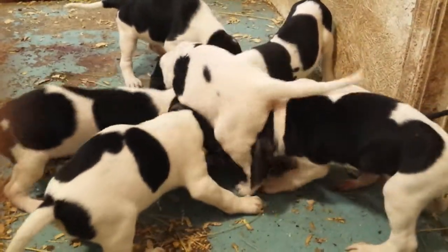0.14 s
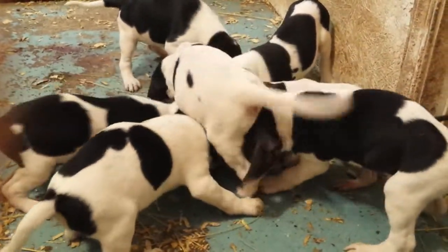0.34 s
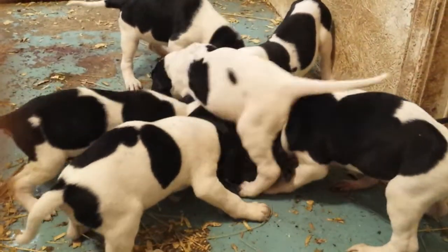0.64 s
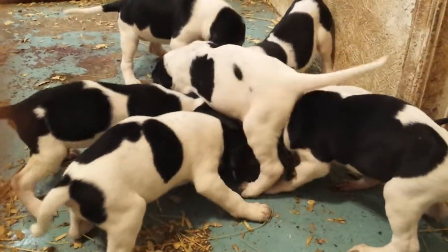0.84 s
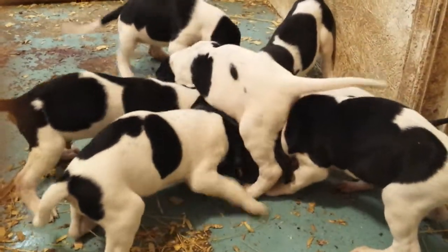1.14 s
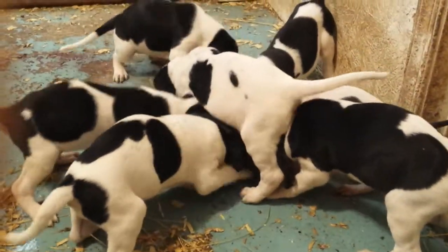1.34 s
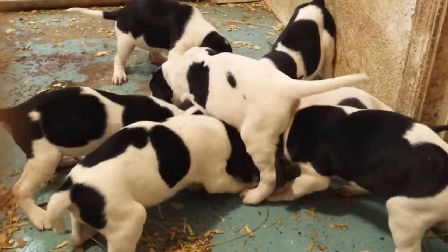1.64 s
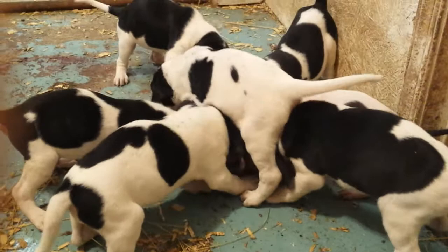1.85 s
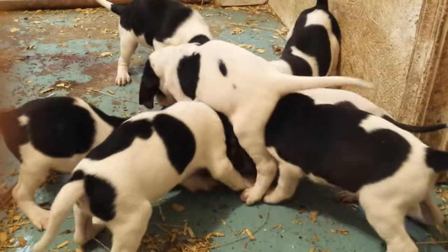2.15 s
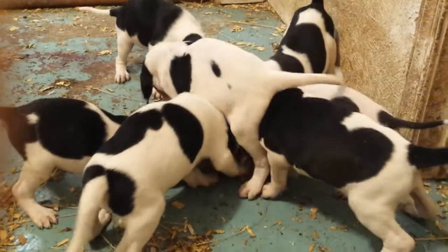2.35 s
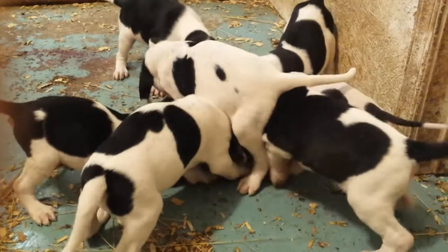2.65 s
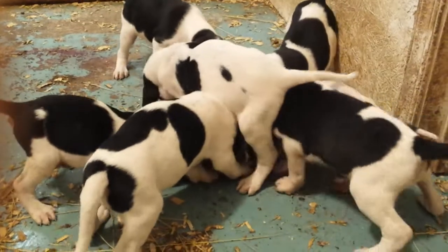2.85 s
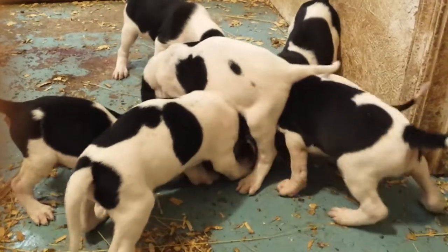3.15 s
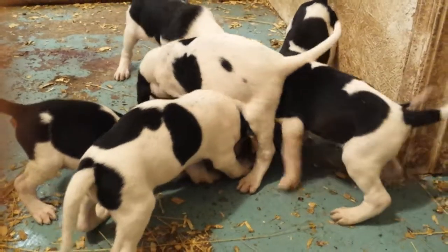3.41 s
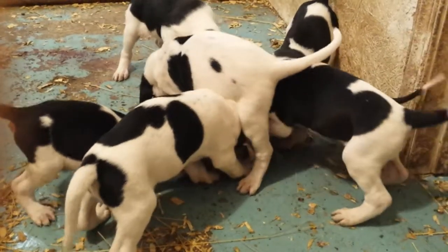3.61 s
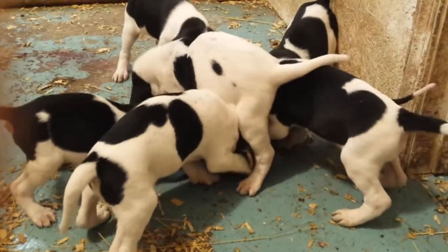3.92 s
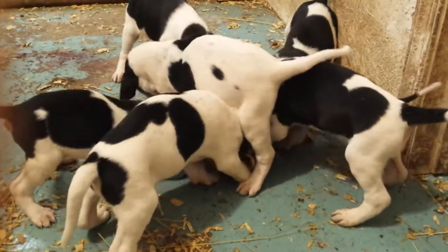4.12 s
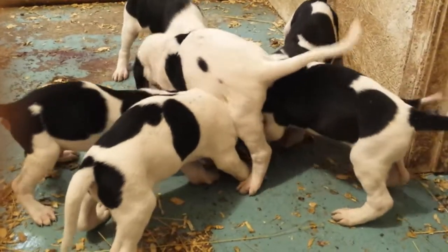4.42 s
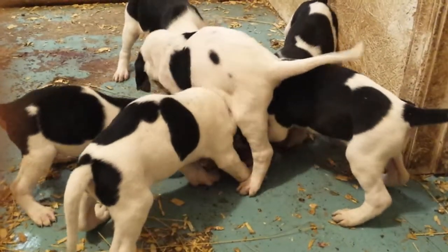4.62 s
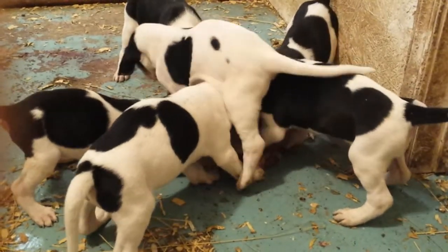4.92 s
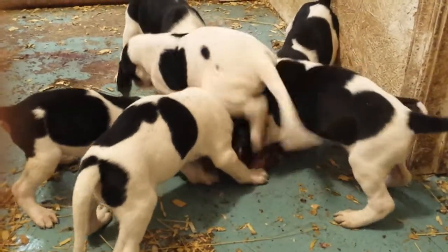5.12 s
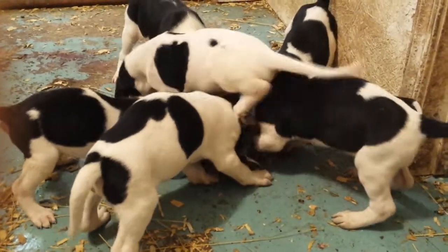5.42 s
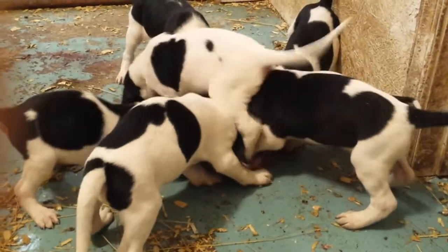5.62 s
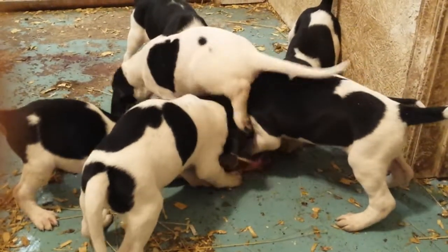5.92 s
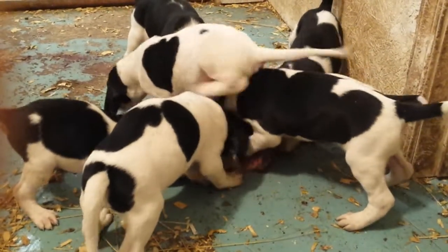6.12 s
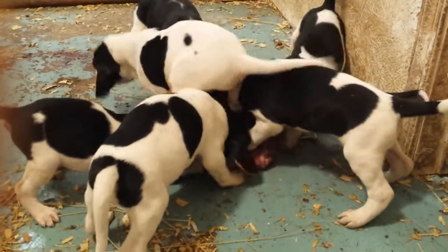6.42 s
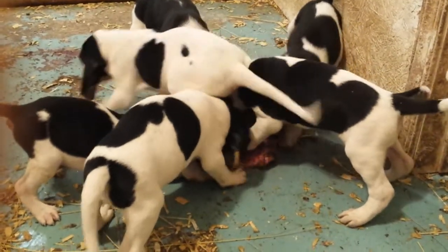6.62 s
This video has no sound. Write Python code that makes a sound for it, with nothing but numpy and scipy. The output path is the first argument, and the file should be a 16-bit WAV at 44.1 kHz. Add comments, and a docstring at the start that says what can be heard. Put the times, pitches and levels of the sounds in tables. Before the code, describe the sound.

In a small, lively indoor pen, close-up straw scuffs and dry crackles run under puppy voices. An unsteady whine comes early, then scattered short yips, a sharp click around one and a half seconds, paw thuds and an overlapping group of yips. Later a louder whine slides downward, followed by brief yips, a low grunt and wet chewing clicks, over very faint room rumble.

```python
"""A hard-walled pen, where puppies crowd over a piece of food about a metre from a stereo microphone.
They whine and yip, two at once at times, as quavering harmonics coloured by throat and nose; the nose
whistles are nearly pure tones. Jaws smack and click as short resonant noise, paws thud as dying sines,
straw rustles as crackling noise, and the room rings after every call with wall echoes and a diffuse tail."""
import sys
import numpy as np
from scipy import signal
from scipy.fft import rfft, irfft, next_fast_len
from scipy.io import wavfile

SR = 44100
rng = np.random.default_rng(int(sys.argv[2]) if len(sys.argv) > 2 else 0)


def wav_out(sig):
    """Save sig, one row per channel (or a flat mono array), as 16-bit PCM at SR to the path in sys.argv[1]."""
    wavfile.write(sys.argv[1], SR, np.round(np.clip(np.atleast_2d(sig).T, -1, 1) * 32767).astype(np.int16))


N = 298116
TIME = np.arange(N) / SR

# Event levels in the tables are starting points in dB; the functions trim them further.

# faint rumble of the building: hz [Hz], relative_db [dB]
ROOM_TONE = [(12, -63), (20, -4.5), (103, -5.5), (160, -10.5), (270, -8), (310, -12.5), (656, -12.5),
             (1240, -22), (2930, -25.5), (3970, -20), (9370, -24), (12400, -31), (15000, -31.5)]
ROOM_TONE_DB = -57.5
# decay of the room's tail: hz [Hz], t60_s [s]
ROOM_T60 = [(150, 0.13), (600, 0.5), (1400, 0.47), (4000, 0.27), (8000, 0.4), (14000, 0.13)]
# room (width, length, height) and the microphone's place in it, in m
ROOM_M, MIC_M = (3.3, 4.1, 2.4), (1.9, 1.7, 0.94)
# tone balance of the microphone's two ports: hz [Hz], left_minus_right_db [dB]
PORT_BALANCE = [(60, 2), (110, 2.5), (200, 1), (380, 1.5), (690, 2), (1280, 2.5), (2360, -2.5), (4360, 3),
                (8040, -8), (14800, 0)]
TOP_HZ = 14700

# colour of the rubbed straw: hz [Hz], gain_db [dB]
STRAW_COLOUR = [(150, -15.5), (260, -2), (650, -4), (1400, -5), (1900, -8), (2600, -11.5), (3500, -7.5),
                (4400, -3), (5200, -6), (6400, 2.5), (7700, -6), (9200, -11.5), (11000, -22.5),
                (14500, -49)]
# scuffs of paws and bodies through the straw: start_s [s], length_s [s], level_db [dB]
SCUFFS = [(0.004, 0.12, -46), (0.193, 0.099, -47), (0.342, 0.03, -45.5), (0.539, 0.33, -48.5),
          (0.952, 0.09, -46.5), (1.112, 0.078, -40.5), (1.305, 0.066, -48), (1.571, 0.038, -42.5),
          (1.714, 0.16, -48), (1.922, 0.052, -47.5), (2.14, 0.017, -69), (2.195, 0.11, -58.5),
          (2.369, 0.029, -48), (2.45, 0.26, -50), (2.75, .12, -46), (2.95, 0.63, -52.5),
          (3.328, 0.19, -48.5), (3.611, 0.045, -41.5), (3.735, 0.2, -46.5), (3.94, 0.12, -49.5),
          (4.073, 0.12, -50), (4.287, 0.046, -48), (4.563, 0.027, -44.5), (4.66, 0.065, -52),
          (4.855, 0.15, -49.5), (5.01, 0.33, -48), (5.399, 0.091, -45.5), (5.668, 0.13, -46.5),
          (5.875, 0.048, -45), (5.983, 0.049, -44), (6.189, 0.21, -48), (6.438, .14, -44.5),
          (6.597, 0.25, -44)]
SCUFF_ATTACK_S, SCUFF_T60_S = 0.026, 0.34
STIR_DB = -67  # the straw is never quite still

# paws landing: start_s [s], level_db [dB], pitch_hz [Hz], t60_s [s]
THUDS = [(1.149, -51.5, 171, 0.091), (2.387, -53, 138, 0.067), (3.261, -42, 276, 0.05),
         (3.322, -41, 138, 0.066), (3.343, -42, 232, 0.027), (4.648, -44.5, 219, 0.056),
         (5.377, -42, 170, 0.028), (6.6, -46, 242, 0.048), (6.725, -43, 263, 0.041)]
# low grunt: time_s [s], pitch_hz [Hz], level_db [dB]
GRUNT = [(6.345, 262, -49), (6.358, 231, -40), (6.38, 195, -52)]

# colour of small hard cracks and scraping stalks: hz [Hz], gain_db [dB]
CLICK_COLOUR = [(1500, -4), (3000, 0.5), (4500, 4.5), (6200, 2.5), (7700, 4.5), (9000, -5.5), (12000, -5),
                (15000, -35)]
# sharp clicks of teeth and claws: start_s [s], level_db [dB], body_db (re click) [dB], ring_hz [Hz]
CLICKS = [(0.352, -54, 2, 5000), (0.4821, -45.5, 5.5, 7310), (0.9543, -36.5, -7, 4310),
          (1.336, -37, -9, 6360), (1.363, -37, -6, 7440), (1.505, -34, -6, 6450), (1.557, -34, -3, 6400),
          (1.59, -21, -3.5, 6600), (2.2265, -44.5, -2, 6400), (2.8623, -31, -2.5, 4200),
          (3.261, -33.5, -20, 6550), (3.298, -40.5, -6, 6470), (3.585, -38, 0.5, 4390),
          (6.5798, -28.5, -9, 5700), (6.7276, -35.5, -11, 4330)]
CLICK_PAN_DB = 1  # left minus right
# loudest ticks of snapping straw: start_s [s], level_db [dB], left_minus_right_db [dB]
TICKS = [(0.681, -32, 0), (2.448, -33, 1), (2.521, -32.5, 7), (3.179, -33, 0), (3.3367, -32.5, 6),
         (3.3635, -29, 1), (3.733, -28.5, 10), (4.812, -35.5, 2), (4.8698, -32.5, 5), (5.3947, -27.5, 1),
         (5.598, -29.5, 1.5), (6.1575, -27.5, 0), (6.4006, -35, -6)]
TICK_HZ, TICK_SCATTER = 6200, 0.023  # ring of a stalk, and its spread as a share from stalk to stalk
# wet smacks and hisses of the mouth: start_s [s], level_db [dB], mouth_hz [Hz], length_s (twice the rise) [s]
SMACKS = [(0, -32, 4240, 0.017), (0.241, -47, 3350, 0.019), (0.34, -41.5, 1250, 0.0064),
          (0.35, -35, 1040, 0.005), (1.024, -41.5, 1180, 0.015), (1.09, -44.5, 630, 0.021),
          (2.859, -38, 1090, 0.005), (3.291, -48.5, 2070, .01), (3.59, -45, 1240, 0.005),
          (4.529, -49, 1220, 0.0086), (4.994, -42, 675, 0.016), (5.416, -43, 5540, 0.036),
          (5.845, -43, 4730, 0.027), (6.231, -49, 1620, 0.0053), (6.432, -45.5, 1180, 0.026),
          (6.588, -30, 705, 0.005), (6.723, -31, 830, 0.0032)]

# thin nose whistles, one list each: time_s [s], pitch_hz [Hz], level_db [dB]
WHISTLES = [
    [(.022, 7650, -37), (.036, 7480, -27), (.055, 7170, -35), (.075, 7420, -35)],
    [(3.09, 8370, -55), (3.125, 8000, -63)],
    [(3.4, 8520, -47), (3.42, 8500, -52)],
    [(5.205, 8040, -43.5), (5.25, 8020, -43.5), (5.29, 7700, -68)],
]
# open mouth, weighted by 5 - nasality for overtones and by 1 for breath: hz [Hz], gain_db [dB]
THROAT = [(1400, 5), (2050, 3.5), (2400, 0), (2850, -0.5), (3500, 4.5), (4200, 2.5), (4900, 2.5),
          (5600, -1.5), (7600, 2.5), (8600, -4), (12000, -49)]
# nose, weighted by nasality: hz [Hz], gain_db [dB]
NOSE = [(1400, -1.5), (2300, -16), (3000, -5), (3700, -10.5), (4400, 1), (5200, -22), (6100, 14.5),
        (7900, 2), (9000, -12), (12000, -53)]
# yips, each a rougher catch, a quick glide up or down to a clearer note, and a slide as it fades:
# start_s [s], catch_s [s], note_s [s], catch_hz [Hz], note_hz [Hz], end_hz [Hz], catch_db [dB], note_db [dB],
# octave_db (re level) [dB], overtone_db (re level) [dB], roughness [0 clear, 1 rough], nasality [0-2],
# right_m [m], ahead_m [m]
YIPS = [(0, 0.0028, 0.0084, 764, 781, 763, -8, -35.5, -19.5, -10, 0.38, 1, 0.066, 1.27),
        (1.126, 0.032, 0.034, 463, 560.7, 514, -35.5, -24, -18, -22, 0.49, 0.71, 0.13, 1.23),
        (1.762, .02, 0.045, 573, 710, 654, -26.5, -26, -13, -23.5, 0.08, 0.77, 0.059, 1.07),
        (3.491, 0.0049, 0.019, 569, 513, 566, -36, -36.5, -18.5, -20, 0.44, 0.35, 0.094, 0.67),
        (3.865, .002, 0.0034, 693, 712, 726, -33, -45.5, -12.5, -11, 0.15, .5, 0.14, 1.26),
        (3.896, .02, .13, 695, 738, 640.6, -31, -31.5, -17.5, -16.5, 0.16, 1, 0.05, 1.3),
        (3.918, 0.0022, 0.052, 890, 889, 835, -59, -28.5, -13, -10, 0.26, 0.03, 0.061, 1.0),
        (3.997, 0.0019, 0.0126, 812, 818.4, 788, -38, -36.5, -5, -3.5, 0.44, .05, 0.11, 1.0),
        (4.638, 0.0046, .035, 589, 483, 540, -41.5, -40.5, -23.5, -17.5, 1.11, 1, 0.013, 1.1),
        (5.823, .028, .035, 505, 668, 563.6, -38, -27.5, -22.5, -24, 0.82, 1, 0.035, 1.19),
        (5.958, 0.003, 0.052, 870, 836, 820, -36, -42.5, -20.5, -18, 0.54, 0.2, 0.044, 1.16),
        (6.254, 0.017, 0.034, 447, 636, 603.4, -44, -28.5, -23, -23, 0.24, .95, .031, 0.97),
        (6.607, 0.0019, 0.039, 778, 783, 802, -35, -31.5, -15.5, -24, 0.24, 0.57, 0.023, 1.25)]
GLIDE_S, FADE_DB = 0.01464, 5  # time from catch to note; loss of level along the note
CATCH_OCTAVE_DB, END_OCTAVE_DB = 6.5, 7  # lift of the octave in the catch and at the end of the note
CATCH_OVERTONE_DB, CATCH_SAG = 4, 0.016  # the catch is brighter, and its pitch sags by this share
CATCH_SHIFT = 0.61  # share of the way from catch level to note level covered before the glide
CLEAR_SHARE = 0.53  # share of the roughness that stays in the note
# two long whines, one quavering, one sinking: time_s [s], pitch_hz [Hz], level_db [dB], octave_db (re level) [dB]
WHINES = [
    [(.585, 540, -45, -9), (.612, 491.5, -38.5, -6.5), (.638, 562, -29, -20), (.652, 758, -33.5, -9.5),
     (.665, 661.5, -30.5, -.5), (.69, 728, -28, -8), (.73, 663.6, -43, 4), (.742, 638.4, -27, 2),
     (.764, 653, -47, 11.5), (.777, 722, -28, -9), (.8, 649.5, -22.5, -27), (.825, 680, -35.5, 2)],
    [(5.016, 700, -26.5, -19), (5.065, 757.5, -38.5, -9), (5.11, 734.4, -29, -21),
     (5.168, 763.4, -44.5, -1), (5.182, 747, -28, -22), (5.215, 663.5, -26, -13), (5.25, 640, -26.5, -16),
     (5.285, 581.6, -20, -24), (5.332, 548, -26.5, -35.5)],
]
# voice of each long whine: mean_overtone_db [dB], start_roughness [0-1], nasality [0-2], right_m [m], ahead_m [m]
WHINERS = [(-50.5, 0.59, 0.14, 0.12, 1.1), (-50, 0, 0.97, 0.065, .85)]
SETTLE_S, SETTLED_ROUGH = 0.052, 0.014  # a long whine soon clears to this roughness
CREAK_HZ, CREAK_ROUGH = 674, 0.93  # below this pitch it creaks: added roughness per share of pitch lost


def undb(db):
    """Decibels to gain."""
    return 10 ** (np.asarray(db) / 20)


def unit(x):
    """Scale to rms 1."""
    return x / np.sqrt(np.mean(x ** 2) + 1e-20)


def at(points, hz):
    """Read a spectrum on a log-frequency axis."""
    f, value = np.transpose(points)
    return np.interp(np.log(np.maximum(hz, 1)), np.log(f), value)


def shape(x, gain):
    """Filter by a gain that is a function of frequency."""
    size = x.shape[-1]
    return irfft(rfft(x) * gain(np.arange(size // 2 + 1) * SR / size), size)


def colour(x, points, size=512):
    """Minimum-phase filter with the given spectrum, so that attacks stay sharp."""
    hz = np.arange(size // 2 + 1) * SR / size
    cepstrum = irfft(np.log(undb(at(points, hz))))
    # fold the cepstrum forward to make the filter causal
    cepstrum[1:size // 2] *= 2
    cepstrum[size // 2 + 1:] = 0
    impulse = irfft(np.exp(rfft(cepstrum)))
    return signal.lfilter(impulse, 1, x)


def resonate(x, hz, q):
    """One resonance."""
    return signal.lfilter(*signal.iirpeak(hz, q, fs=SR), x)


def wobble(size, hz):
    """Smooth random motion of spread 1, mostly slower than hz."""
    noise = rng.standard_normal(next_fast_len(size + SR // 4))
    return unit(shape(noise, lambda f: 1 / (1 + (f / hz) ** 4)))[:size]


def pan(x, db):
    """Place a sound by its left-minus-right level."""
    return x * undb(np.array([[db], [-db]]) / 2)


def add(out, x, s):
    """Mix x in at time s."""
    i = max(int(s * SR), 0)
    out[..., i:i + x.shape[-1]] += x[..., :max(N - i, 0)]


def diffuse(size, alike_hz=850):
    """Noise from all sides: the bass is alike in both channels."""
    mid, side = rng.standard_normal((2, size))
    side = shape(side, lambda f: np.hypot(f, alike_hz / 4) / np.hypot(f, alike_hz))
    return unit(mid + side * np.array([[1], [-1]]))


def burst(t60, size=2048):
    """A crack of noise that dies away, drawn separately for each channel."""
    return rng.standard_normal((2, size)) * undb(-60 * TIME[:size] / t60)


def snap(hz, t60, ring=2.7, q=4):
    """Something small and hard cracks and rings briefly at its own pitch."""
    crack = burst(t60)
    ringing = crack + ring * resonate(crack, hz, q)
    return colour(ringing, CLICK_COLOUR) / (1 + ring / 2)


def play(rows, fade_s=0.0042):
    """Soft on-off gate of one call, then its controls sample by sample."""
    s, *columns = np.transpose(rows)
    t = np.arange(s[0], max(s[-1], s[0] + fade_s) + fade_s, 1 / SR)
    gate = np.clip(np.minimum(t - t[0], t[-1] - t) / fade_s, 0, 1)
    return [gate] + [np.interp(t, s, column) for column in columns]


def tone(rows, waver):
    """A nearly pure, wavering note."""
    gate, hz, db = play(rows)
    hz = hz * (1 + waver * wobble(len(hz), 360))
    note = np.sqrt(2) * np.sin(2 * np.pi * np.cumsum(hz) / SR)
    out = np.zeros(N)
    add(out, gate * undb(db) * note, rows[0][0])
    return out


def room_tone():
    """A faint rumble of the building: diffuse noise shaped towards the bass."""
    return unit(shape(diffuse(N), lambda f: undb(at(ROOM_TONE, f)))) * undb(ROOM_TONE_DB)


def room(right_m, ahead_m, tail_db, bounce=0.58, width=1.7, build_s=0.019, order=3):
    """Stereo response to a sound on the floor: mirror images in the walls, then a frequency-dependent tail."""
    source = (MIC_M[0] + right_m, MIC_M[1] + ahead_m, 0)
    turn = np.arange(-order, order + 1)
    images = [turn * wall + np.where(turn % 2, wall - s, s) - mic
              for wall, s, mic in zip(ROOM_M, source, MIC_M)]
    x, y, z = np.meshgrid(*images)
    r = np.sqrt(x ** 2 + y ** 2 + z ** 2)
    bounces = sum(np.meshgrid(abs(turn), abs(turn), abs(turn)))
    # the floor's image coincides with the source, hence 1 + bounce
    gain = bounce ** bounces * r.min() / r / (1 + bounce)
    lag = np.rint((r - r.min()) / 343 * SR).astype(int)  # speed of sound 343 m/s
    t = TIME[:int(.5 * SR)]
    # each channel favours what arrives from its own side
    early = np.array([np.bincount(lag.ravel(), (gain * (1 + side * width * x / r)).ravel(), len(t))
                      for side in (-1, 1)])
    noise = diffuse(len(t), 980)
    centres = [hz for hz, _ in ROOM_T60]
    tail = 0
    for weights, (_, t60) in zip(np.eye(len(centres)), ROOM_T60):
        band = shape(noise, lambda f: at(list(zip(centres, weights)), f))
        tail = tail + band * undb(-60 * t / t60)
    tail = unit(tail * (1 - np.exp(-(t / build_s) ** 2))) / np.sqrt(len(t))
    return early + tail * undb(tail_db)


def echo(x, response):
    """Play a sound into the room."""
    return signal.fftconvolve(np.atleast_2d(x), response, axes=1)[:, :N]


def scuffing():
    """How hard the straw is rubbed: scuffs with attack, hold and release over a faint constant stir."""
    power = np.full(N, undb(STIR_DB) ** 2)
    for s, length, db in SCUFFS:
        t = TIME[:int((length + SCUFF_T60_S) * SR)]
        attack = np.minimum(t / SCUFF_ATTACK_S, 1)
        release_db = -60 * np.maximum(t - length, 0) / SCUFF_T60_S
        add(power, (attack * undb(db + release_db)) ** 2, s)
    return np.sqrt(power)


def straw(rustle_db=-3.0, grains_hz=1400, spread_db=2.5, flutter_db=2, stalk_db=-4, stalk_q=14, count=420):
    """Fur and paws rub over straw: a hiss full of tiny crackles, and single stalks scraping at their own pitch."""
    sizes = undb(spread_db * np.minimum(rng.exponential(size=N), 5))
    grains = (rng.random(N) < grains_hz / SR) * sizes
    crackle = signal.fftconvolve(grains[None], burst(0.0034), axes=1)[:, :N]
    hiss = unit(colour(unit(crackle) + diffuse(N), STRAW_COLOUR))
    stalks = np.zeros((2, N))
    for when, pitch, size, length in rng.random((count, 4)):
        scrape = resonate(burst(0.075 + 0.02 * length), 3500 + 5000 * np.sqrt(pitch), stalk_q)
        add(stalks, scrape * undb(-16 * size), when * TIME[-1])
    rustle = hiss + undb(stalk_db) * unit(colour(stalks, CLICK_COLOUR))
    return rustle * scuffing() * undb(rustle_db + flutter_db * wobble(N, 8.5))


def paws():
    """Soft pads thud on the floor as quickly rising, dying sines; a puppy grunts."""
    out = tone(GRUNT, waver=0.016)
    t = TIME[:SR // 4]
    for s, db, hz, t60 in THUDS:
        envelope = undb(db - 60 * t / t60) * (1 - np.exp(-t / 0.0027))
        add(out, 2 * envelope * np.sin(2 * np.pi * hz * t), s)
    return out


def chewing(click_db=2, body_db=3, tick_db=-4, smack_db=-1, mouth_q=2.6):
    """Teeth and claws click, straw snaps, and wet smacks ring the mouth cavity."""
    out = np.zeros((2, N))
    for s, db, low_db, hz in CLICKS:
        body = 2 * resonate(burst(0.034), 980, 0.87)
        click = snap(hz, t60=0.024) + undb(low_db + body_db) * body
        add(out, pan(click, CLICK_PAN_DB) * undb(db + click_db), s)
    for s, db, pan_db in TICKS:
        hz = TICK_HZ * (1 + TICK_SCATTER * rng.standard_normal())
        add(out, pan(snap(hz, t60=0.029), pan_db) * undb(db + tick_db), s)
    for s, db, hz, length in SMACKS:
        t = TIME[:SR // 4] / length
        wet = unit(resonate(resonate(diffuse(len(t)), hz, mouth_q), hz, mouth_q / 2))
        swell = 2 * t * np.exp(1 - 2 * t)  # peaks at 1, halfway through the length
        add(out, wet * swell * undb(db + smack_db), s)
    return out


def whine(rows, nasal, jitter=0.11, shimmer=0.86, quiver=0.00612, flicker_db=3, count=20):
    """Vocal folds: strong fundamental, octave and weak, flickering overtones; strain makes cycles uneven."""
    gate, hz, db, octave_db, overtone_db, rough = play(rows)
    size = len(hz)
    hz = hz * (1 + jitter * rough * wobble(size, 197) + quiver * wobble(size, 36.4))
    phase = 2 * np.pi * np.cumsum(hz) / SR
    overtones = 0
    for k in range(3, count):
        tract_db = (5 - nasal) * at(THROAT, k * hz) + nasal * at(NOSE, k * hz)
        partial = np.sin(k * phase + rng.uniform(0, 2 * np.pi))
        overtones = overtones + undb(tract_db + flicker_db * wobble(size, 25)) * partial
    # air hisses through the folds once a cycle
    air = colour(rng.standard_normal(size), THROAT) * (1 + np.cos(phase))
    upper = unit(unit(overtones) + rough * unit(air))
    lower = np.sqrt(2) * (np.sin(phase) + undb(octave_db) * np.sin(2 * phase))
    voice = lower + undb(overtone_db) * upper
    return gate * undb(db) * voice * (1 + shimmer * rough * wobble(size, 145))


def yip(s, catch_s, note_s, catch_hz, note_hz, end_hz, catch_db, note_db, octave_db, overtone_db, rough):
    """Catch, glide and fading note: rows of time_s, pitch_hz, level_db, octave_db, overtone_db, roughness."""
    glide = s + catch_s
    note = glide + GLIDE_S
    clear = rough * CLEAR_SHARE
    glide_db = catch_db + CATCH_SHIFT * (note_db - catch_db)
    catch_colour = (octave_db + CATCH_OCTAVE_DB, overtone_db + CATCH_OVERTONE_DB, rough)
    return [(s, catch_hz * (1 + CATCH_SAG), catch_db, *catch_colour),
            (glide, catch_hz, glide_db, *catch_colour),
            (note, note_hz, note_db, octave_db, overtone_db, clear),
            (note + note_s, end_hz, note_db - FADE_DB, octave_db + END_OCTAVE_DB, overtone_db, clear)]


def drawn_out(curve, overtone_db, rough, opening=0.94):
    """A long whine clears, and creaks where it sinks; overtones swell with the octave as the mouth opens."""
    s, hz, db, octave_db = np.transpose(curve)
    mouth_db = db + octave_db
    upper_db = overtone_db + opening * (mouth_db - mouth_db.mean()) - db
    creak = CREAK_ROUGH * np.maximum(1 - hz / CREAK_HZ, 0)
    roughness = SETTLED_ROUGH + creak + rough * np.exp(-(s - s[0]) / SETTLE_S)
    return np.transpose([s, hz, db, octave_db, upper_db, roughness])


def voices(whistle_db=-1):
    """Every call sounds from its own spot in the pen; noses whistle now and then."""
    whistles = sum(tone(rows, waver=0.0082) for rows in WHISTLES)
    out = echo(whistles, room(0, 1, tail_db=-8)) * undb(whistle_db)
    calls = [(yip(*row[:-3]), row[-3:]) for row in YIPS]
    calls += [(drawn_out(curve, *row[:-3]), row[-3:]) for curve, row in zip(WHINES, WHINERS)]
    for rows, (nasal, right_m, ahead_m) in calls:
        add(out, echo(whine(rows, nasal), room(right_m, ahead_m, tail_db=-4.5)), rows[0][0])
    return out


def scene(voice_db=-2):
    """Voices, chewing and straw ring in the room; paws stay dry, and a faint rumble lies under all."""
    near_floor = room(0, .8, tail_db=-6.5, bounce=0.2, build_s=0.0092)
    small_noises = echo(chewing() + straw(), near_floor)
    return room_tone() + paws() + small_noises + voices() * undb(voice_db)


def record(dry):
    """The microphone's two ports differ in tone; the top is cut."""
    heard = shape(dry, lambda f: undb(np.array([[1], [-1]]) * at(PORT_BALANCE, f) / 2))
    return signal.sosfilt(signal.ellip(10, .2, 80, TOP_HZ, fs=SR, output="sos"), heard)


dry = scene()
out = record(dry)
wav_out(out)
```